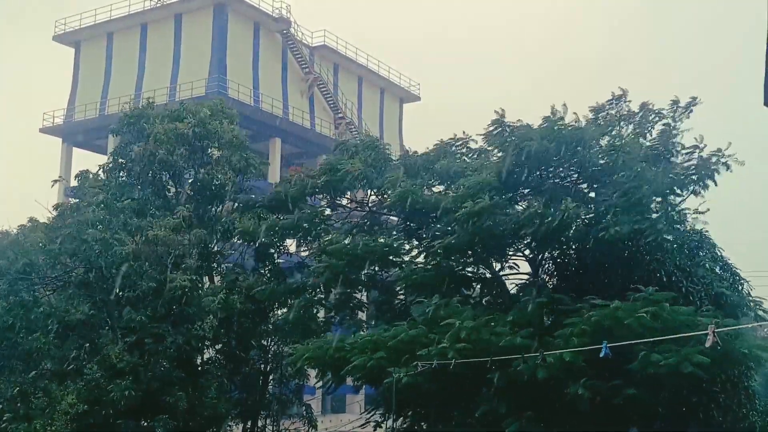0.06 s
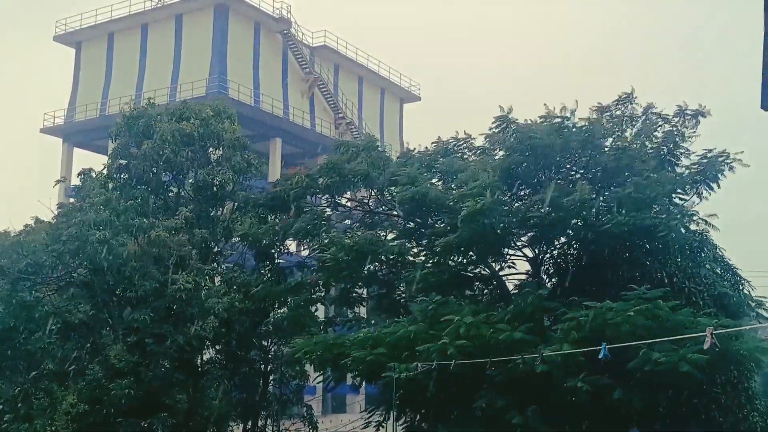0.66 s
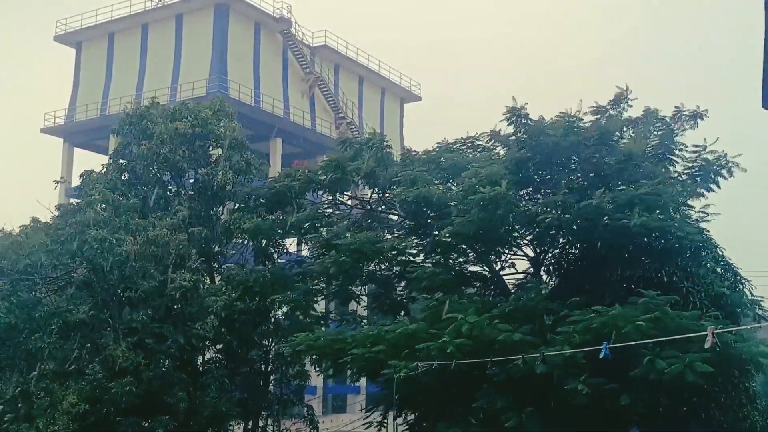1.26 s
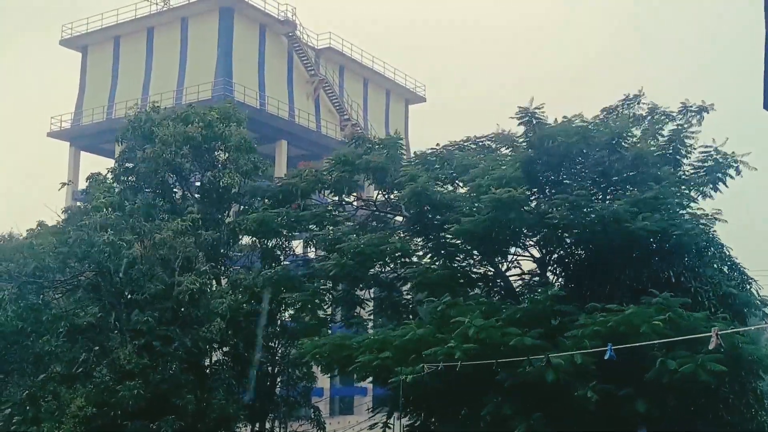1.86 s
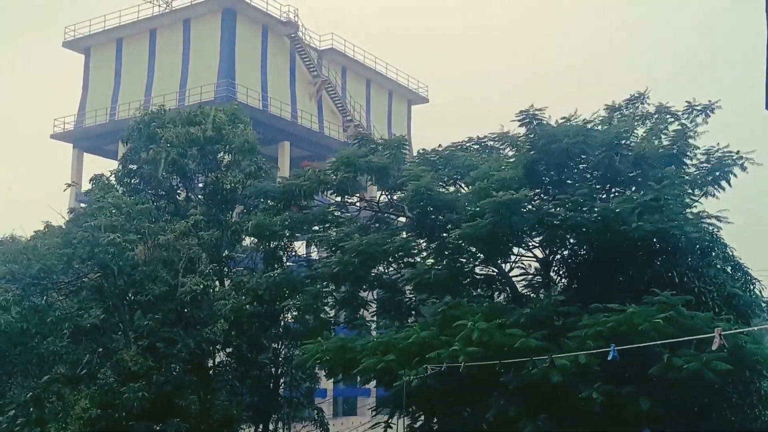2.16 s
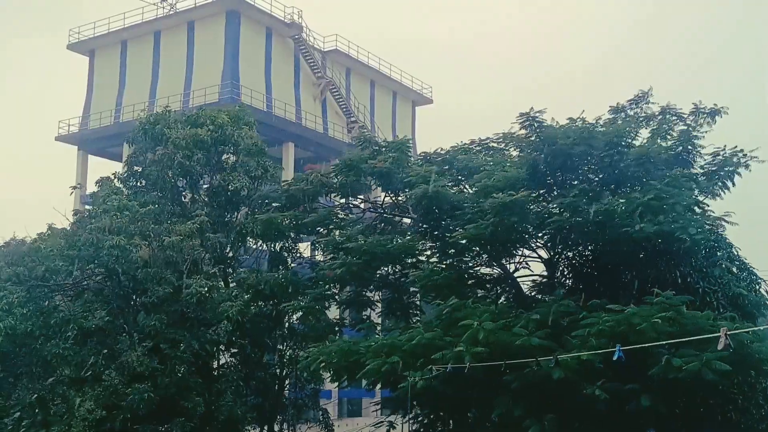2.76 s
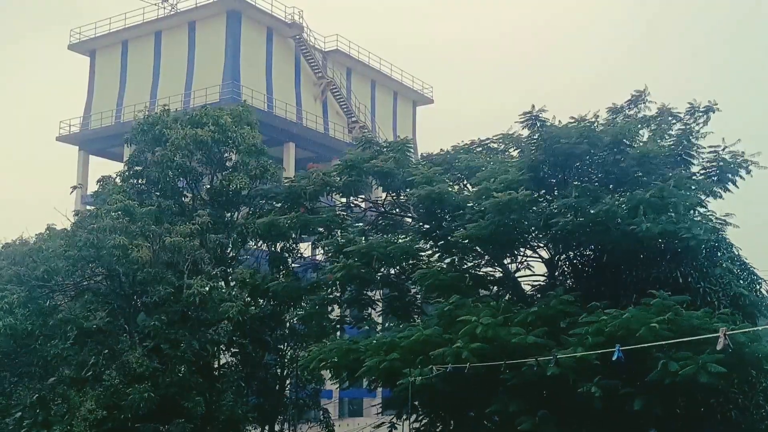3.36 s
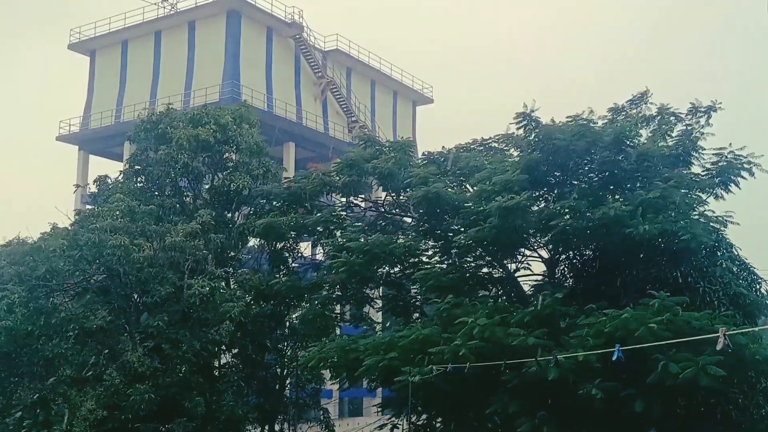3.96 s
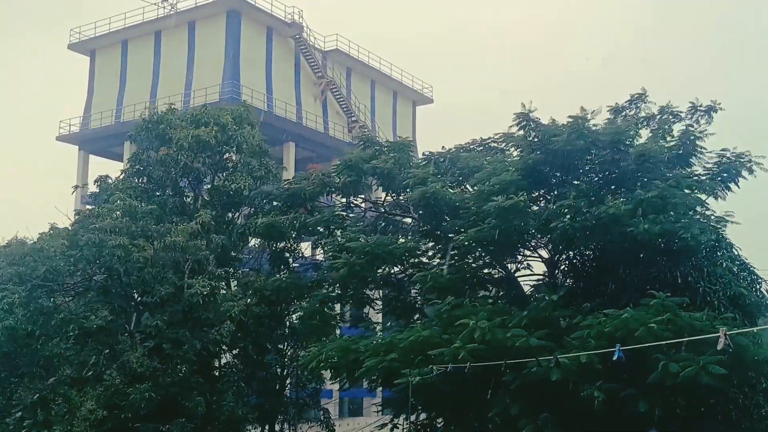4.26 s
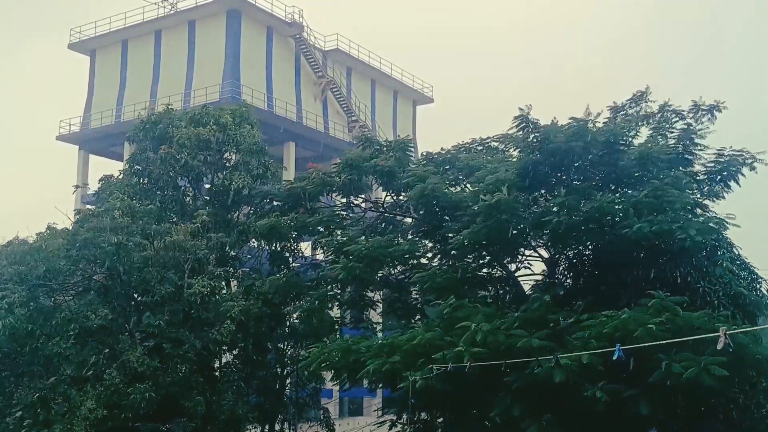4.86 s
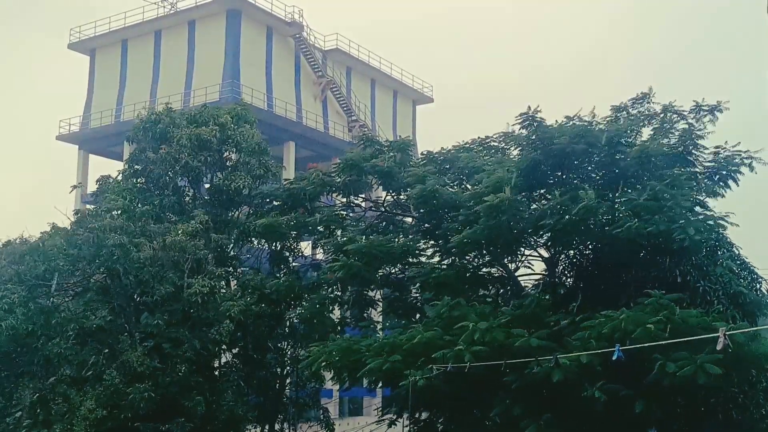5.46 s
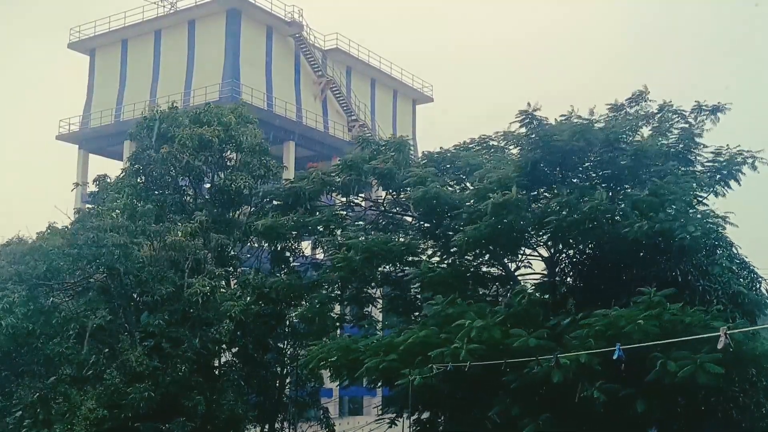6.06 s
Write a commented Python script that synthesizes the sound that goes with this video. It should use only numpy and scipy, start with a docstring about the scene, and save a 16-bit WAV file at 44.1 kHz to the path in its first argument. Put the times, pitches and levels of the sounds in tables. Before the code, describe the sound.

Thunder breaks at once with a loud, dull clap and rumbles on in swells over steady rain hissing on trees. Small drops tick and fatter ones land close by. About halfway a second, darker roll takes over. Near the end a spill of water splashes onto the ground, and the rain builds as the thunder fades. It is heard outdoors through a hand-held phone, with a short echo off buildings.

```python
"""Thunder breaks at once over heavy rain on trees, heard through a hand-held phone.
Shock waves from a long lightning channel arrive in swells and claps and echo between buildings,
while rain hisses all around and, from 0.6 s, fat drops land close by.
At 3.2 s a second, darker roll takes over; just after 5 s a spill of water splashes down,
and the rain builds as the thunder fades."""
import sys
import numpy as np
from scipy import signal
from scipy.fft import rfft, irfft, next_fast_len
from scipy.io import wavfile
from scipy.ndimage import uniform_filter1d, minimum_filter1d

SR = 44100
rng = np.random.default_rng(int(sys.argv[2]) if len(sys.argv) > 2 else 0)


def store_pcm(level_fs):
    """Save levels as 16-bit WAV."""
    pcm = np.round(np.clip(level_fs, -1, 1) * 32767).astype(np.int16)
    wavfile.write(sys.argv[1], SR, np.atleast_2d(pcm).T)


N = 273420
TIME = np.arange(N) / SR
SIZE = next_fast_len(N + SR)
FREQ = np.arange(SIZE // 2 + 1) * SR / SIZE


def undb(db):
    """Decibels to gain."""
    return 10 ** (np.asarray(db) / 20)


def unit(x):
    """Scale to rms 1."""
    return x / np.sqrt(np.mean(x ** 2))


def colour(points):
    """EQ curve through (f/Hz, level/dB) points."""
    hz, db = np.transpose(points)
    return undb(np.interp(np.log(FREQ + 1), np.log(hz), db))


def bump(hz, width):
    """Gain curve of one resonance."""
    return 1 / np.sqrt(1 + (2 * (FREQ - hz) / width) ** 2)


def shape(x, gain):
    """Filter by a gain at every frequency."""
    return irfft(rfft(x, SIZE) * gain, SIZE)[..., :N]


def delay(seconds):
    """Frequency response of a pure delay."""
    return np.exp(-2j * np.pi * FREQ * seconds)


def walk(rate):
    """Random drift, spread near 1, with `rate` turns a second."""
    knots = rng.standard_normal(1024)
    return np.interp(TIME * rate, np.arange(len(knots)), knots)


def impacts(rate, spread_db):
    """Impulses at random times: many small, a few large."""
    hit = rng.random(N) < rate / SR
    size = undb(spread_db * np.minimum(rng.exponential(size=N), np.sqrt(20)))
    return hit * size * np.sign(rng.standard_normal(N))


def burst(start, rise, decay):
    """Envelope with a quick attack and an exponential tail, peak 1."""
    age = np.maximum(TIME - start, 0)
    env = (1 - np.exp(-age / rise)) * np.exp(-age / decay)
    return env / env.max()


def swell(start, rise, fade, hold=0.045):
    """Envelope that builds, holds briefly and falls by `fade` dB a second."""
    age = TIME - start
    return np.clip(age / rise, 0, 1) * undb(-fade * np.maximum(age - rise - hold, 0))


def even(x, seconds):
    """Hold the short-term power of a sound at 1."""
    span = max(int(seconds * SR), 2)
    power = uniform_filter1d(uniform_filter1d(x ** 2, span), span)
    return x / np.sqrt(power + 1e-12)


def roll(spectrum):
    """Shock waves from every kink of the channel overlap; near parts growl, far parts only boom."""
    # one swell per branch of the channel: t/s, level/dB, rise/s, fade/(dB/s), growl/dB, deep bass/dB
    swells = [(0.0, -16.5, 0.0017, 46, 4, -9), (0.28, -30.5, .06, 17, 5.5, -2),
              (0.57, -22, 0.022, 13.5, -1.5, -11), (1.28, -26, 0.086, 84, -10, -11),
              (1.53, -22.5, .22, 20.5, -7.5, -8.5), (2.64, -25, .11, 31, -5, -8),
              (3.214, -20, 0.0071, 32.5, -5.5, -11), (3.51, -18, 0.1, 51.5, -11, -9),
              (4.26, -34, 0.033, 8, -5, -19), (4.57, -27.5, .08, 12, -5.5, -20),
              (5.17, -28.5, .21, 15.5, -1.5, -17), (6.0, -41, 0.059, 20, 4, 3)]
    rumble_db = [-39, -40, -50.5]  # steady distant bed: body, growl, deep bass
    power = undb(rumble_db)[:, None] ** 2
    for start, db, rise, fade, growl_db, deep_db in swells:
        env = swell(start, rise, fade)
        deep_env = env ** 1.4  # the deep bass comes and goes faster
        power = power + (undb(db) * np.array([env, undb(growl_db) * env, undb(deep_db) * deep_env])) ** 2
    shocks = shape(impacts(rate=900, spread_db=1.0), colour(spectrum))
    growl = 1 / (1 + (190 / (FREQ + 1)) ** 8)  # above 190 Hz
    deep = 1 / (1 + (FREQ / 75) ** 8)  # below 75 Hz
    body = 1 - growl - deep
    bands = [even(shape(shocks, band), seconds=0.086) for band in (body, growl, deep)]
    return undb(-2.0) * np.sum(np.sqrt(power) * bands, axis=0)


def claps():
    """A stretch of channel lying broadside arrives at once: a few strong, uneven pressure swings."""
    # thunder claps: t/s, level/dB, f/Hz
    hits = [(0.001, 0.5, 204), (0.085, 4, 202), (0.281, -5, 205), (0.596, -7, 161.7), (1.083, -7, 200),
            (1.274, -12, 204), (1.709, -8, 174), (1.757, -8.5, 185), (1.818, -7, 128.4), (2.759, -5.5, 136),
            (2.837, -9.5, 124), (3.219, -5, 132), (3.256, -6.5, 89.5), (3.394, -12.5, 110)]
    out = np.zeros(N)
    for start, db, hz in hits:
        pitch = hz * np.exp(0.17 * walk(rate=220))
        cycles = np.cumsum(pitch * (TIME > start)) / SR
        out += undb(db) * burst(start, rise=0.003, decay=0.019) * np.sin(2 * np.pi * cycles)
    return shape(out, colour([(20, -18), (50, -7), (400, -6), (1500, -25.0)]))  # air soaks up the crack


def thunder():
    """One roll gives way to a darker one; both come from the left, and house walls scatter an echo."""
    # tone of the thunder: f/Hz, first roll level/dB, second roll level/dB
    tones = [(20, -58, -49), (32, -25, -28), (46, -9, 0), (68.4, -4.5, -8), (89, 3.5, -1), (126, 6.5, 2.5),
             (164.4, 3, -2), (207, 1, -8), (247, -3, -6.5), (308.5, -5.5, -6.5), (375, -14.5, -17),
             (520, -24.5, -39), (830, -34.5, -52), (6000, -130, -130)]
    tones = np.array(tones)
    second_roll_s, right_lag_s = 3.214, 0.00024
    crossfade = np.clip((TIME - second_roll_s) / 0.0026, 0, 1)
    direct = (1 - crossfade) * roll(tones[:, [0, 1]]) + crossfade * roll(tones[:, [0, 2]]) + claps()
    walls = rng.standard_normal((2, N)) * burst(0, rise=0.0069, decay=0.091)
    walls /= np.sqrt(np.sum(walls ** 2, axis=1, keepdims=True))
    echo_eq = colour([(60, -47.5), (150, -19), (300, -6), (600, -3.5), (2000, -34)])
    echo = shape(direct, rfft(walls, SIZE) * echo_eq)
    return np.array([direct, shape(direct, delay(right_lag_s))]) + echo


def rain_wash():
    """Countless drops on trees all around; each direction has its own lag between the two mic ports."""
    # tone of rain on leaves and ground: f/Hz, level/dB
    rain_tone = [(60, -14), (250, 3.5), (500, 4.5), (650, 2.5), (1030, -1), (1400, 2.5), (1750, 0.5),
                 (2400, -8.5), (2800, -2), (3550, -1.5), (4200, -14), (5500, -15), (7000, -22),
                 (15000, -32)]
    # resonances and hollows around the phone: f/Hz, width/Hz, level/dB
    nooks = [(607, 39, -7), (696, 70, 0.5), (867, 57, 4.5), (1210, 67, 4), (1680, 92, -4.5), (2012, 90, 6),
             (6650, 480, 5)]
    directions, port_gap_m = 12, 0.1422
    spectrum = 0
    for angle in (np.arange(directions) + .5) * np.pi / directions:
        patter = unit(impacts(rate=900, spread_db=3.0))
        hiss = rng.standard_normal(N)
        flutter = undb(2.25 * walk(rate=14))
        sector = rfft((hiss + undb(-6) * patter) * flutter, SIZE)
        sector *= undb(-1.5 * np.cos(angle))  # the nearest trees stand on the right
        lag = port_gap_m * np.cos(angle) / 343
        spectrum = spectrum + np.array([sector, sector * delay(lag)])
    nook_db = sum(db * bump(hz, width) ** 2 for hz, width, db in nooks)
    return unit(irfft(spectrum * colour(rain_tone) * undb(nook_db), SIZE)[:, :N])


def near_rain():
    """Small drops near the phone: fine ticks, and softer splats that spray for a few milliseconds."""
    ticks = np.array([impacts(rate=91, spread_db=4.0) for _ in range(2)])
    tick_eq = colour([(800, -8), (3300, 13), (4500, 5.5), (8000, -1), (15000, -4)])
    out = undb(-26.0) * unit(shape(ticks, tick_eq))
    # bands of the splats: f/Hz, width/Hz, level/dB
    splat_bands = [(1960, 660, -16.5), (3360, 930, -15.0), (5900, 4300, -24.5), (13400, 9000, -33.5)]
    tail = rfft(burst(0, rise=0.00082, decay=0.0058), SIZE)
    for hz, width, db in splat_bands:
        power = shape(impacts(rate=45, spread_db=3.5) ** 2, tail)
        spray = np.sqrt(np.abs(power)) * rng.standard_normal((2, N))
        out = out + undb(db) * unit(shape(spray, bump(hz, width) ** 2))
    return out


def splash(start, rise, decay, eq):
    """Water breaks into a cloud of droplets that crackle and die away."""
    droplets = np.array([impacts(rate=10000, spread_db=0.5) for _ in range(2)])
    return unit(shape(droplets, eq)) * burst(start, rise, decay)


def fat_drops():
    """Fat drops ring briefly around one pitch, low on leaves and high on hard ground."""
    # close landings: t/s, level/dB, f/Hz, decay/s
    drops = [(0.627, -42.5, 5530, 0.0076), (1.129, -33.5, 3350, 0.004), (1.241, -31, 3240, .007),
             (2.270, -30.5, 3270, 0.005), (2.277, -33, 1970, 0.0092), (2.478, -45.5, 6060, 0.03),
             (2.479, -51, 13000, 0.012), (2.865, -48, 7600, .003), (3.249, -56, 13500, .02),
             (3.667, -33, 3300, 0.0055), (3.992, -46, 6200, 0.0086), (4.049, -37.5, 3350, 0.01),
             (4.102, -49, 12500, .004), (5.236, -42, 12500, 0.0008), (5.760, -42, 13500, .001),
             (5.802, -45, 13500, .001)]
    return sum(undb(db) * splash(start, rise=7 / hz, decay=decay, eq=bump(hz, 0.26 * hz) ** 2)
               for start, db, hz, decay in drops)


def spill():
    """Gathered water hits the ground in a quick run of broad splashes."""
    # splashes of the spill: t/s, level/dB, rise/s, decay/s, f/Hz
    splashes = [(5.122, -27, 0.02, 0.039, 2520), (5.165, -34.5, .02, 0.064, 2820),
                (5.228, -33, .004, 0.028, 3120), (5.232, -37.5, .0015, 0.015, 6950)]
    ground = colour([(300, 0), (1500, 2.0), (7500, -3.5), (15000, -20)])
    return sum(undb(db) * splash(start, rise, decay, bump(hz, width=980) * ground)
               for start, db, rise, decay, hz in splashes)


def scene():
    """Thunder over rain, drops and a spill; the water is brighter on the right."""
    # level ride of the rain bed: t/s, level/dB
    shower = [(0.0, -36.5), (1.21, -38.5), (1.75, -42), (2.35, -38), (3.25, -40.3), (4.0, -40),
              (4.65, -39.2), (5.55, -35.5), (6.2, -35.5)]
    # stereo tilt of the water: f/Hz, left minus right level/dB
    tilt = [(400, -0.5), (800, -0.5), (1300, -1.5), (2400, -5), (3400, -4), (4400, -7), (8000, -4),
            (14000, -1.5)]
    bed_trim_db, close_trim_db = 4, [[0.5], [-0.5]]  # close water: left, right
    bed_db = bed_trim_db + np.interp(TIME, *np.transpose(shower))
    close = (fat_drops() + spill()) * undb(close_trim_db)
    water = undb(bed_db) * (rain_wash() + near_rain()) + close
    left_eq = np.sqrt(colour(tilt))
    return thunder() + shape(water, np.array([left_eq, 1 / left_eq]))


def record(dry):
    """The mic ports colour the treble, a limiter holds down the loudest claps, and the top is cut."""
    # response of the microphone ports: f/Hz, level/dB
    ports = [(8300, 0.5), (9000, -8.5), (9700, -5), (10500, -4), (11300, -10.5), (12000, -4.5),
             (13000, 4.5), (15000, 3.5)]
    ceiling, top_hz = 0.98, 15500
    coloured = shape(dry, colour(ports))
    allowed = ceiling / np.maximum(np.abs(coloured).max(axis=0), ceiling)
    limiter_gain = uniform_filter1d(minimum_filter1d(allowed, size=400), size=400)
    lowpass = signal.ellip(10, .2, 80, top_hz, fs=SR, output="sos")
    return signal.sosfilt(lowpass, coloured * limiter_gain)


dry = scene()
out = record(dry)
store_pcm(out)
```